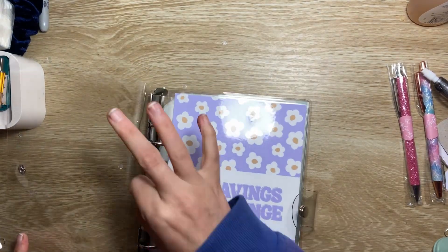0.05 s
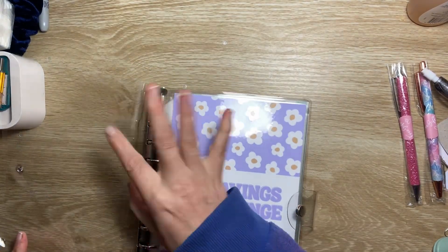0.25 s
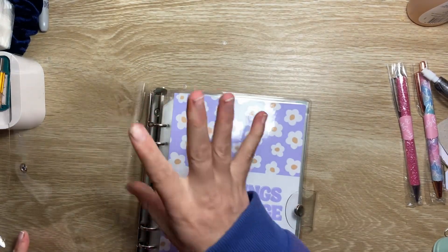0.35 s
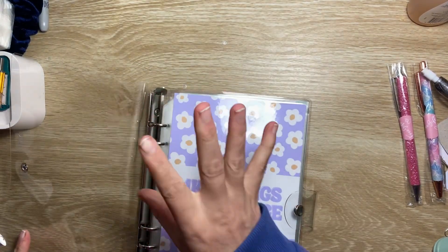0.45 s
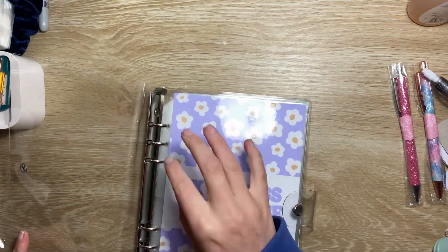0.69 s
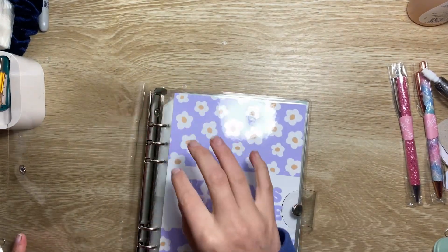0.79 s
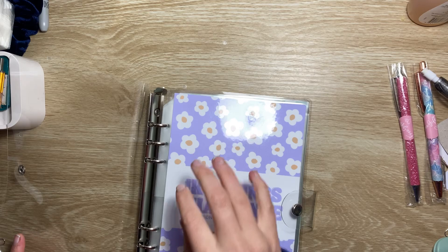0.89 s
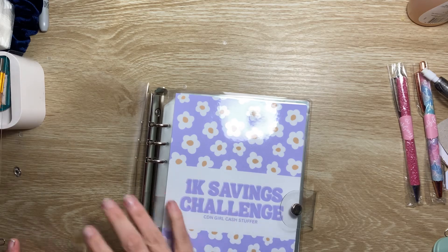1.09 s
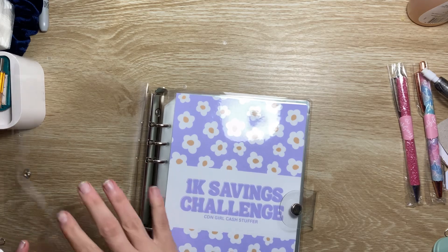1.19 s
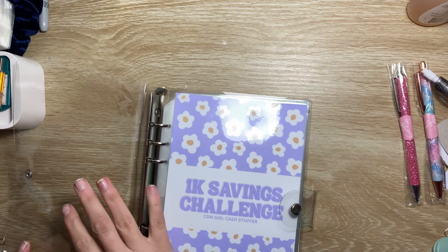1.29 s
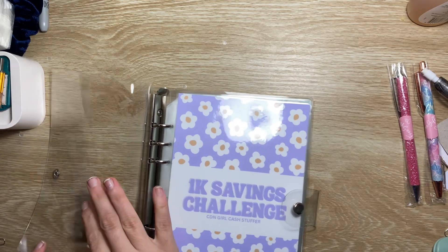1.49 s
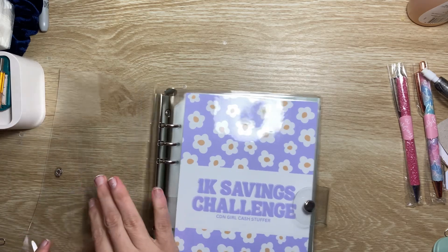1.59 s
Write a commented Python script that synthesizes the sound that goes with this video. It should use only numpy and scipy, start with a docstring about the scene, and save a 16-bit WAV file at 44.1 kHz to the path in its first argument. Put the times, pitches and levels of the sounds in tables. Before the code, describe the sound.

A plastic binder cover smacks a wooden desk with a sharp crack, then fingertips tap it.

```python
"""Binder cover on a wooden desk

The clear plastic cover of a ring binder drops open and its press stud smacks the desk: knock, crack and ring.
The sheet chatters in short rattles as it settles; then fingertips tap it flat (damped knocks and clacks)
and slide over it (grainy noise, tiny snaps, rising squeaks).
Heard from close above the desk, in a small quiet room with a low hum."""
import sys
import numpy as np
from scipy import signal
from scipy.fft import rfft, irfft
from scipy.io import wavfile
from scipy.ndimage import uniform_filter1d

SR = 44100
rng = np.random.default_rng(int(sys.argv[2]) if len(sys.argv) > 2 else 0)


def digitize_waveform(pressure):
    """Quantize a signal to 16-bit integers and store it at the path in sys.argv[1].

    Rows of a 2-D input are taken as channels; values are limited to [-1, 1].
    """
    field = np.atleast_2d(pressure).T
    bounded = np.clip(field, -1, 1)
    quanta = np.round(bounded * 32767).astype(np.int16)
    wavfile.write(sys.argv[1], SR, quanta)


N = 72765
SIZE = 32768  # samples in each struck sound
T, HZ = np.arange(SIZE) / SR, np.fft.rfftfreq(SIZE, 1 / SR)


def amp(db):
    """Decibels to gain."""
    return 10 ** (np.asarray(db) / 20)


def unit(x):
    """Scales to an energy of one per channel."""
    return x / np.sqrt(np.sum(x ** 2) / len(np.atleast_2d(x)) + 1e-20)


def read(points, hz):
    """Reads a table on a log-frequency axis."""
    f, value = np.transpose(points)
    return np.interp(np.log(hz + 1), np.log(f + 1), value)


def fade(t, t60):
    """Falls by 60 dB in t60 seconds."""
    return np.exp(-np.log(1000) * t / t60)


def pan(x, db):
    """Places a sound by its left-right difference; positive is left."""
    return x * amp([[db / 2], [-db / 2]])


def add(mix, s, sound):
    """Mixes a sound in at time s."""
    part = mix[:, round(s * SR):][:, :sound.shape[1]]
    part += sound[:, :part.shape[1]]


def click(spectrum):
    """The sharpest causal (minimum-phase) pulse with this spectrum."""
    cepstrum = irfft(np.log(amp(read(spectrum, HZ))))
    # fold the time-reversed half onto the causal half
    cepstrum[1:SIZE // 2] *= 2
    cepstrum[SIZE // 2 + 1:] = 0
    return unit(irfft(np.exp(rfft(cepstrum))))


def noise(spectrum, alike, size):
    """Coloured stereo noise of rms one, with a left-right likeness per frequency."""
    hz = np.fft.rfftfreq(size, 1 / SR)
    a, b = rfft(rng.standard_normal((2, size)))
    likeness = np.clip(read(alike, hz), -1, 1)
    mid, side = a * np.sqrt(1 + likeness), b * np.sqrt(1 - likeness)
    x = irfft(np.array([mid + side, mid - side]) * amp(read(spectrum, hz)), size)
    return x / x.std()


def knock(hz, t60, rise_s):
    """A heavily damped swing of the struck surface."""
    rise = 1 - np.exp(-(T / rise_s) ** 2)
    return unit(rise * fade(T, t60) * -np.sin(2 * np.pi * hz * T))


def rattle(spectrum, t60, spread):
    """A click and the dense, quickly dying modes of the sheet behind it, spread times as strong."""
    ring = unit(noise([(20, 0), (20000, 0)], [(20, .8), (20000, .8)], SIZE) * fade(T, t60))
    hit_and_ring = spread * ring + (T == 0)
    return unit(signal.fftconvolve(click(spectrum)[None], hit_and_ring, axes=1)[:, :SIZE])


def ringing(modes, tilt_db=0):
    """Decaying modes that each swell over about one cycle, tilted by tilt_db per octave."""
    total = 0
    for hz, db, t60 in modes:
        swell = 1 - np.exp(-T * hz)
        level = amp(db + tilt_db * np.log2(hz))
        total = total + level * fade(T, t60) * np.sin(2 * np.pi * hz * T) * swell
    return total


BEND_S = .001  # a wave of f Hz arrives BEND_S * 1000 / (100 + f) late


def bend(x, travel_s):
    """Bending waves carry the treble first, so each hit chirps downward."""
    size = 2 * x.shape[-1]
    turns = travel_s * 1000 * np.log(1 + np.fft.rfftfreq(size, 1 / SR) / 100)
    return irfft(rfft(x, size) * np.exp(-2j * np.pi * turns), size)[..., :size // 2]


# left-right balance of the cover, negative is weaker on the left: f/Hz, level/dB
COVER_SHADE = [(100, 0), (400, -5.5), (700, -4), (1300, -10), (4400, -12), (8000, -4), (12000, 0)]


def off_axis(x, share, lag_s):
    """Sound from one side reaches the left microphone with its lows late and its middle range shaded."""
    size = 2 * x.shape[-1]
    hz = np.fft.rfftfreq(size, 1 / SR)
    shade = amp(share * read(COVER_SHADE, hz) * [[.5], [-.5]])
    left_lag = lag_s / (1 + (hz / 1300) ** 2) * [[1], [0]]  # shrinks toward the treble
    ears = shade * np.exp(-2j * np.pi * hz * left_lag)
    return irfft(rfft(x, size) * ears, size)[:, :size // 2]


# decay of the room tail: f/Hz, T60/s
ROOM_DECAY = [(80, 0.15), (300, 0.25), (1000, .2), (4000, .24)]
# left-right likeness of diffuse room sound: f/Hz, likeness (1 = same on both sides)
ROOM_LIKENESS = [(60, 0.47), (400, 0.75), (1500, 0.3), (6000, .3), (11000, 0.54)]


def room(spectrum, build_s=0.0047):
    """A diffuse tail that builds up and dies band by band."""
    hz, t, bands = signal.stft(noise(spectrum, ROOM_LIKENESS, SIZE), SR, nperseg=256)
    decay = fade(t, read(ROOM_DECAY, hz)[:, None])
    tail = signal.istft(bands * decay, SR)[1][:, :SIZE]
    return unit(tail * (1 - np.exp(-(T / build_s) ** 2)))


def in_room(x, wet_db):
    """Adds the room to a small sound."""
    tail = room([(200, 7.5), (3000, 0.0), (14000, -2.0)])
    return x + amp(wet_db) * signal.fftconvolve(x, tail, axes=1)[:, :N]


# colour of the still room air: f/Hz, relative level/dB
AIR_COLOUR = [(22, -30), (50, 0.5), (100, -3), (170, -17), (300, -20.5), (600, -29.5), (1200, -37.5),
              (5000, -39), (11000, -48), (16000, -58.5)]
AIR_DB, HUM_HZ, HUM_DB = -69.5, 46.3, -61  # air is rms, hum is peak


def background():
    """Quiet room air as shaped noise, and a deep steady hum as one sine."""
    hum = amp(HUM_DB) * np.sin(2 * np.pi * (HUM_HZ * np.arange(N) / SR + rng.random()))
    return amp(AIR_DB) * noise(AIR_COLOUR, ROOM_LIKENESS, N) + hum


# colour of the sheet's clack: f/Hz, relative level/dB per Hz
CLACK_COLOUR = [(200, -9.5), (800, 0), (2200, 0), (4300, -3), (5500, -15), (7500, -26), (10500, -21.5),
                (15000, -37)]
SHEET_T60 = 0.01  # s
CRINKLE_PER_S, CRINKLE_SPREAD_DB = 700, 2.5


def crinkle():
    """Tiny snaps of the flexing sheet at random moments, mostly faint; rms one."""
    struck = rng.random(N) < CRINKLE_PER_S / SR
    strength = amp(CRINKLE_SPREAD_DB * np.minimum(rng.exponential(1, N), np.pi))
    snaps = struck * rng.choice([-1, 1], N) * strength
    sheet = rattle(CLACK_COLOUR, SHEET_T60, spread=2.3)
    x = signal.fftconvolve(np.diff(snaps, prepend=0)[None], sheet, axes=1)[:, :N]
    return x / x.std()


# sliding fingers, before the grain and pan: t/s, rub level/dB, fine swish level/dB
SLIDE_LEVELS = [(.42, -99, -99), (.6, -87, -80), (.63, -93, -100), (1.03, -97, -100), (1.061, -86, -85.5),
                (1.1, -95, -87.5), (1.16, -77, -83), (1.22, -81, -88), (1.3, -86, -98.5),
                (1.335, -78, -104), (1.38, -78, -100), (1.425, -83.5, -95), (1.47, -70, -79.5),
                (1.54, -66.5, -75.5), (1.6, -69.5, -81), (1.65, -65.5, -75.5)]
# colour of the rub: f/Hz, relative level/dB per Hz
RUB_COLOUR = [(100, -5.5), (400, -3.5), (650, 0.5), (900, 2.5), (1600, -2), (4300, -7), (5600, -17.5),
              (7800, -21.5), (16000, -40)]
# colour of the fine swish: f/Hz, relative level/dB per Hz
SWISH_COLOUR = [(100, -25.5), (7500, -18.5), (9700, 0.5), (12000, -0.5), (13500, -10.5), (16000, -19)]
# palm dragging on the binder: t/s, level/dB
PALM_LEVELS = [(1.2, -110), (1.24, -62), (1.37, -68), (1.45, -55), (1.52, -68.5), (1.65, -64)]
# colour of the palm's dull rub: f/Hz, relative level/dB per Hz
PALM_COLOUR = [(40, -9), (130, 0.5), (260, -11.5), (410, -10), (5000, -75)]
CRINKLE_DB = -5.5  # against the rub noise
RUB_GRAIN_DB, GRIP_DB = 2, 1  # rms swing of the fast and slow unevenness
RUB_PAN_DB = -7.5


def slide():
    """Skin drags over plastic in fine uneven grains; the palm adds a dull rub."""
    t = np.arange(N) / SR
    s, rub_db, swish_db = np.transpose(SLIDE_LEVELS)
    alike = [(200, 0.72), (3000, 0.4), (11000, 0.73)]
    rub = pan(noise(RUB_COLOUR, alike, N) + amp(CRINKLE_DB) * crinkle(), RUB_PAN_DB)
    rub = rub * amp(np.interp(t, s, rub_db))
    swish = noise(SWISH_COLOUR, alike, N) * amp(np.interp(t, s, swish_db))
    palm = noise(PALM_COLOUR, alike, N) * amp(np.interp(t, *np.transpose(PALM_LEVELS)))
    grain = uniform_filter1d(rng.standard_normal(N), size=200)
    grip = uniform_filter1d(rng.standard_normal(N), size=900)
    uneven_db = RUB_GRAIN_DB * grain / grain.std() + GRIP_DB * grip / grip.std()
    return (rub + swish) * amp(uneven_db) + palm


# fingertip squeaks, level before the pan: t/s, length/s, centre f/Hz, level/dB
SQUEAK_EVENTS = [(1.323, 0.026, 1203, -68.5), (1.357, 0.0383, 1770, -71.5)]
SQUEAK_RISE, SQUEAK_JITTER = 0.11, .09  # total rise and rms wobble, shares of the pitch


def squeaks():
    """A fingertip sticks and slips: a brief, unsteady, rising tone."""
    out = np.zeros((2, N))
    for s, length, hz, db in SQUEAK_EVENTS:
        u = np.arange(0, length, 1 / SR) / length
        wobble = uniform_filter1d(rng.standard_normal(len(u)), size=60)
        pitch = hz * (1 + SQUEAK_RISE * (u - .5) + SQUEAK_JITTER * wobble / wobble.std())
        tone = np.sin(np.pi * u) * np.sin(2 * np.pi * np.cumsum(pitch) / SR)
        add(out, s, pan(amp(db) * tone, RUB_PAN_DB))
    return out


# finger taps: t/s, knock level/dB, knock f/Hz, clack level/dB, sheet f/Hz, sheet level/dB
TAP_EVENTS = [(1.055, -66, 800, -56, 1700, -61), (1.232, -29, 380, -33, 3750, -39),
              (1.234, -31.5, 863, -35.5, 2770, -37.5), (1.3933, -31.5, 890, -34.5, 1720, -34),
              (1.3955, -26.5, 814, -39.5, 3310, -38.5), (1.3975, -27, 480, -42, 2520, -41),
              (1.4394, -21, 278, -27, 3750, -27), (1.4404, -31, 1000, -30, 3380, -30.5),
              (1.442, -26.5, 750, -29, 2090, -27.5), (1.6272, -29, 724, -29.5, 2060, -25.5),
              (1.6285, -24.5, 760, -25.5, 3014, -25.5)]
# thuds of the hand on the desk: t/s, energy level/dB, f/Hz
THUD_EVENTS = [(1.24, -29, 64), (1.247, -36, 144), (1.408, -23, 112), (1.444, -26.5, 94.9),
               (1.503, -29.5, 160.8), (1.531, -26, 69.4)]
# low modes of the desk and the room: f/Hz, relative level/dB, T60/s
LOW_MODES = [(62, -34, .3), (80, -32, .36), (122.4, -30.5, .22), (186, -35, 0.2), (242, -30.5, 0.076),
             (346.7, -22.5, 0.088), (485.3, -28, .1), (668, -35.5, 0.11)]
# modes of the binder's sheet and rings: f/Hz, relative level/dB, T60/s
BINDER_MODES = [(787, -37, .17), (925, -30.5, 0.074), (972, -30.5, .1), (1077, -34.5, .13),
                (1206, -43.5, .27), (1614.6, -47, .16), (2055, -43, .1), (4500, -50, .12),
                (4740, -49.5, .14)]
KNOCK_T60, KNOCK_RISE_S, CLACK_T60, TAP_ROOM_DB = 0.0091, 0.00077, 0.033, -13.5
TAP_LOW_DB, TAP_BINDER_DB = -11, -8.5  # ringing against the knock and the clack
TAP_TILT_DB = 4.5  # per octave: light taps favour the upper modes
THUD_T60, THUD_RISE_S = 0.11, 0.0063  # s


def taps():
    """Fingertips slap the sheet onto the wood, desk, room and binder ring, and the hand lands softly."""
    out = np.zeros((2, N))
    low_ring = amp(TAP_LOW_DB) * unit(ringing(LOW_MODES, TAP_TILT_DB))
    binder = amp(TAP_BINDER_DB) * unit(ringing(BINDER_MODES, TAP_TILT_DB))
    for s, knock_db, hz, clack_db, sheet_hz, sheet_db in TAP_EVENTS:
        thump = amp(knock_db) * (knock(hz, KNOCK_T60, KNOCK_RISE_S) + low_ring)
        clack = amp(clack_db) * (rattle(CLACK_COLOUR, CLACK_T60, spread=5.0) + binder)
        sheet = amp(sheet_db) * knock(sheet_hz, SHEET_T60, KNOCK_RISE_S)
        add(out, s, thump + clack + sheet)
    out = off_axis(in_room(bend(out, BEND_S), TAP_ROOM_DB), share=0.72, lag_s=.00003)
    for s, db, hz in THUD_EVENTS:
        add(out, s, amp(db) * pan(knock(hz, THUD_T60, THUD_RISE_S), db=-2))
    return out


# ticks of the sheet, before the room: t/s, energy level/dB
TICK_EVENTS = [(0.2199, -30), (0.2709, -27), (0.2924, -34), (.3140, -35.5), (.3730, -46.5), (.4240, -40.5),
               (0.4388, -34.5), (0.4413, -34.5), (0.4989, -39), (0.5209, -42.5), (0.5349, -46.5),
               (0.549, -46.5), (0.5772, -46.5), (1.44, -33.5)]
# colour of a tick: f/Hz, relative level/dB per Hz
TICK_COLOUR = [(200, -18.5), (1500, -8.5), (4300, -3), (7500, -12), (9800, -1), (12500, -2.5), (16000, -20)]
TICK_T60, TICK_ROOM_DB = .018, -8


def ticks():
    """The sheet chatters against the desk and the rings in short bright rattles."""
    out = np.zeros((2, N))
    for s, db in TICK_EVENTS:
        add(out, s, amp(db) * rattle(TICK_COLOUR, TICK_T60, spread=3.4))
    return off_axis(in_room(out, TICK_ROOM_DB), share=0.62, lag_s=0)


# colour of the stud's crack: f/Hz, relative level/dB per Hz
CRACK_COLOUR = [(100, -13), (350, 5.5), (700, 3), (1200, -2.5), (2300, -18), (3200, -14), (4600, -9.5),
                (6800, -32.5), (8300, -33.5), (9600, -23.5), (16000, -28.5)]
# early echoes of the knock: delay t/s, level/dB, left-right level/dB
EARLY_ECHOES = [(.0036, -15.5, -3), (.0098, -12.5, -2), (.021, -23, -4.5), (.0385, -26.5, -1),
                (.048, -26, -1.5)]
# colour of the room's answer: f/Hz, relative level/dB per Hz
BOOM_COLOUR = [(60, -3), (200, -3.5), (500, 0.5), (1000, 0), (1300, -6.5), (1700, -10.5), (3000, -26.5),
               (4600, -19), (6500, -27), (10000, -35.5), (16000, -38)]
SMACK_S, SMACK_DB, SMACK_HZ, SMACK_T60, SMACK_RISE_S = .2329, 10, 917, 0.006, .0006
CRACK_S, CRACK_DB, BOOM_DB = .2339, -1.5, -2


def smack():
    """The stud hits the desk: a hollow knock, a crack, echoes, ringing desk, room and binder, and a tail."""
    out = np.zeros((2, N))
    body = amp(SMACK_DB) * bend(knock(SMACK_HZ, SMACK_T60, SMACK_RISE_S), BEND_S)
    add(out, SMACK_S, body[None])
    add(out, CRACK_S, amp(CRACK_DB) * bend(click(CRACK_COLOUR), BEND_S)[None])
    add(out, CRACK_S, amp(-9) * rattle(CLACK_COLOUR, t60=.022, spread=4.4))
    add(out, CRACK_S, amp(-16.0) * rattle(TICK_COLOUR, t60=0.043, spread=2.8))
    out = off_axis(out, share=.92, lag_s=.00017)
    for delay, db, side_db in EARLY_ECHOES:
        add(out, SMACK_S + delay, amp(db) * pan(body, side_db))
    ring = ringing(LOW_MODES) + ringing(BINDER_MODES)
    add(out, CRACK_S, off_axis(ring, share=.6, lag_s=.0003))
    add(out, CRACK_S, off_axis(amp(BOOM_DB) * room(BOOM_COLOUR), share=0.43, lag_s=0))
    return out


def scene():
    """Everything on the desk, and the room around it."""
    return background() + slide() + squeaks() + taps() + ticks() + smack()


LOW_CUT_HZ, EDGE_HZ = 23, 16300


def record(dry):
    """A gentle bass cut and a steep treble limit."""
    dry = signal.sosfilt(signal.butter(2, LOW_CUT_HZ, "high", fs=SR, output="sos"), dry)
    band_limit = signal.firwin(511, EDGE_HZ, window=("kaiser", 9), fs=SR)
    return signal.oaconvolve(dry, band_limit[None], "same")


dry = scene()
out = record(dry)
digitize_waveform(out)
```